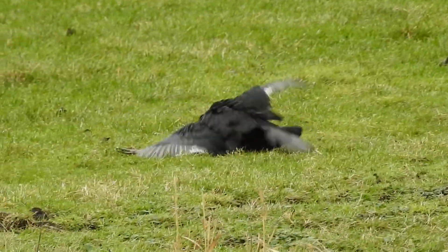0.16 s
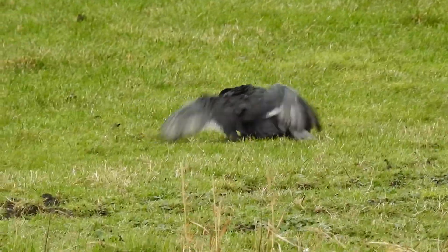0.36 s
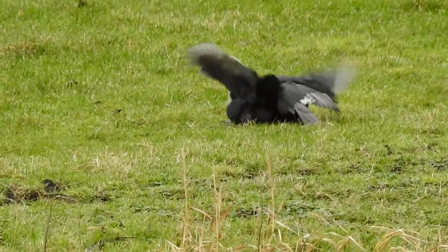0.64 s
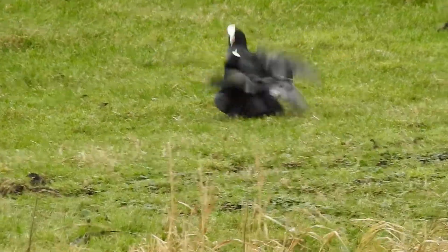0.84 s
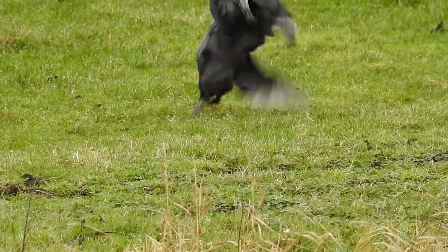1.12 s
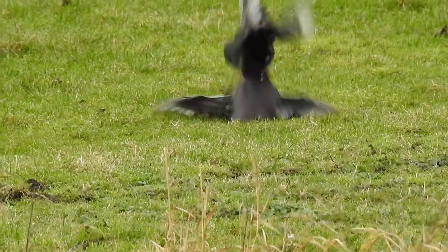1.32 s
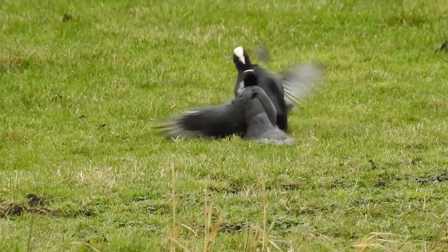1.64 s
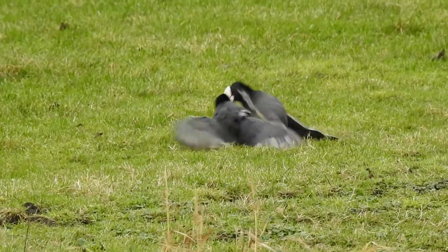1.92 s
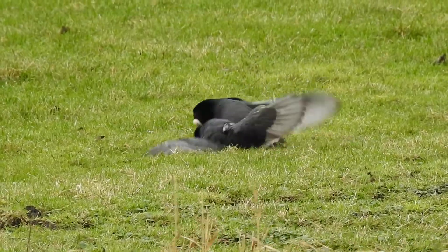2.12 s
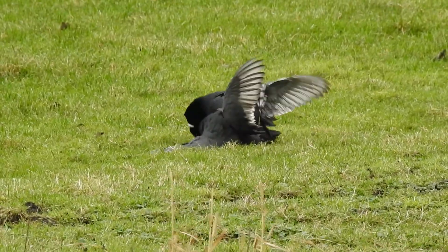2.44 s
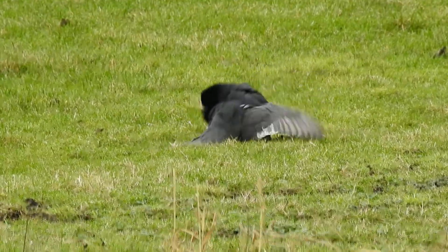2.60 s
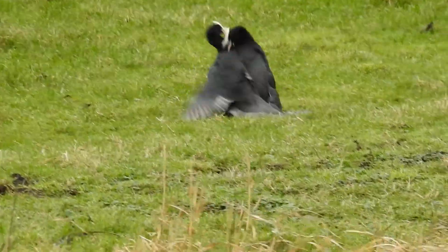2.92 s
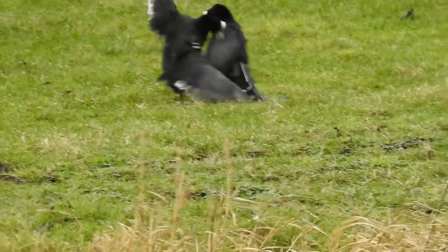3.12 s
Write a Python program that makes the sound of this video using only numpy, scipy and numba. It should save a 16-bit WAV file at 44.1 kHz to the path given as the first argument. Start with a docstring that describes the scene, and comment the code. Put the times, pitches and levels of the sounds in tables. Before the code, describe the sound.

Wind rumbling hard on a microphone over distant roar, while a water bird squeaks briefly twice

```python
"""Gusty wind on a camera in an open field

Wind thuds on both microphone ports, as two mostly unrelated noises, over a far roar and hiss of wide noise.
Close enough to hear through it, a water bird squeaks twice, as stacks of overtones on an arched pitch.
Another bird rasps faintly (rough pulses in a resonance) and one gives a thin peep (a wavering sine).
The strongest wind drives the camera's limiter, which ducks everything in small gain steps."""
import sys
import numpy as np
from scipy import signal
from scipy.fft import rfft, irfft, next_fast_len
from scipy.io import wavfile
from scipy.ndimage import uniform_filter1d, map_coordinates
from numba import njit

SR = 44100
rng = np.random.default_rng(int(sys.argv[2]) if len(sys.argv) > 2 else 0)


def wav_record(signal):
    """Record a signal, one row per channel, as 16-bit PCM in the file named by sys.argv[1]."""
    frames = np.transpose(np.atleast_2d(signal))
    bounded = np.clip(frames, -1, 1)
    # unit amplitude maps onto the largest positive 16-bit level
    quanta = np.round(bounded * 32767).astype(np.int16)
    wavfile.write(sys.argv[1], SR, quanta)


N = 143766
TIME_S = np.arange(N) / SR


def amp(db):
    """Gain of a dB value."""
    return 10 ** (np.asarray(db) / 20)


def unit(x):
    """Scaled to rms 1."""
    return x / np.sqrt(np.mean(x ** 2) + 1e-20)


def over_time(points):
    """(time [s], value) points joined by straight lines over the whole timeline."""
    return np.interp(TIME_S, *np.transpose(points))


def along(points, hz):
    """(frequency [Hz], value) points read on a log frequency axis."""
    f, v = np.transpose(points)
    return np.interp(np.log(hz + 1), np.log(f + 1), v)


def wobble(rate):
    """A smooth random curve with this many knots a second, at most 100."""
    knots = rng.standard_normal(int(N * 100 / SR) + 9)
    return map_coordinates(knots, [TIME_S * rate])


def filtered(x, response):
    """x times a response of frequency, which may be complex."""
    m = next_fast_len(N + SR // 2)
    spectrum = rfft(x, m) * response(np.fft.rfftfreq(m, 1 / SR))
    return irfft(spectrum, m)[..., :N]


def gate(start_s, length_s, attack_s, release_s):
    """Attack, hold and release with sine-shaped edges, silent elsewhere."""
    t = TIME_S - start_s
    edges = np.minimum(t / attack_s, (length_s - t) / release_s)
    return np.sin(np.pi / 2 * np.clip(edges, 0, 1))


def stereo_noise(white, spectrum, alike):
    """Two white noises coloured, then mixed as mid and side to a left-right likeness, rms 1."""
    def mid_side_response(hz):
        turn = np.arccos(along(alike, hz)) / 2
        return amp(along(spectrum, hz)) * [np.cos(turn), np.sin(turn)]

    mid, side = filtered(white, mid_side_response)
    return unit(np.array([mid + side, mid - side]))


def wind():
    """Turbulence on the two ports: low thuds, whose bright edge grows faster than the gust itself."""
    # Wind at the ports before the port gain: (time [s], level [dB])
    gusts = [(0.0, -29), (0.09, -34.5), (0.32, -32.5), (0.36, -22.5), (0.39, -27), (0.43, -23.5),
             (0.48, -26), (0.51, -14.5), (0.58, -16), (0.61, -14), (0.66, -19.5), (0.71, -14.5),
             (0.73, -26.5), (0.81, -31), (0.84, -20.5), (0.96, -29.5), (0.97, -19.5), (1.04, -35),
             (1.06, -18), (1.13, -23), (1.15, -16), (1.31, -15), (1.33, -11.5), (1.42, -20.5),
             (1.43, -11.5), (1.46, -32.5), (1.54, -23), (1.57, -32.5), (1.67, -31.5), (1.68, -46),
             (1.75, -35.5), (1.78, -28.5), (1.88, -35), (2.11, -32), (2.31, -12), (2.46, -19), (2.5, -10),
             (2.61, -18.5), (2.66, -16.5), (2.72, -25), (2.76, -17.5), (2.81, -37), (3.03, -24.5),
             (3.07, -12.5), (3.12, -15), (3.15, -11.5), (3.18, -15.5), (3.26, -14)]
    # Brief puffs and dips in the wind: (centre [s], length [s], level change [dB])
    brief_changes = [(0.577, .02, 0), (1.19, 0.036, 2.5), (1.327, .03, -3.5), (2.335, 0.0067, 4.5),
                     (2.351, 0.011, 10), (2.494, .03, 2), (2.539, 0.0087, 9), (2.664, 0.026, 8),
                     (3.072, 0.025, 7.5), (3.106, 0.03, 6.5), (3.135, 0.0092, 8), (3.16, 0.011, 8),
                     (3.188, .025, 10)]
    # Brightness of the wind, beside its growth with level: (time [s], bright edge gain [dB])
    brightness = [(0, 8), (.4, -13), (.6, -5.5), (.9, 4), (1.1, -15), (1.3, 2), (1.5, -5), (2, -7),
                  (2.3, 1.5), (2.5, 2.5), (2.7, -4), (3.1, 3.5), (3.26, 2.5)]
    # Weight of the deepest rumble: (time [s], gain [dB])
    deep_weight = [(0, 3.5), (.3, 7), (.7, 3), (1.1, 2), (1.4, -1), (1.8, 5.5), (2.1, -0.5), (2.5, -0.5),
                   (2.8, -1), (3.26, -4)]
    # Colour of the low thuds: (frequency [Hz], level per Hz [dB])
    thud_colour = [(15, -55.5), (25, -24.5), (75, -15.5), (145, 1.5), (226, 2.5), (436, -11), (480, -16.5),
                   (653, -15.5), (700, -17), (910, -59), (1540, -120)]
    # Colour of the bright edge of strong wind: (frequency [Hz], level per Hz [dB])
    edge_colour = [(100, -38.5), (200, -8), (300, -1), (400, -4), (550, -10.5), (800, -19.5), (1200, -27.5),
                   (2500, -50.5)] + [(9000, -120)]
    # Colour of the faint treble crackle in gusts: (frequency [Hz], level per Hz [dB])
    crackle_colour = [(1000, -90), (7000, -20), (11000, 0), (16000, -2)]
    # Wind shared by the two ports: (frequency [Hz], likeness [-1 to 1])
    ports_alike = [(30, 0.021), (75, 0.41), (150, 0.0091), (300, 0.28), (600, 0)]
    port_db, deep_hz = 2, 112
    flutter_db, fast_flutter_db = 2.5, 1.5
    edge_db, edge_grows, edge_from_db = -5.5, 0.53, -6  # gain; extra dB per dB of wind, from this level
    thud_gives_way = 0.39  # dB the thud loses per dB of brightness above 0
    crackle_db, crackle_scatter_db = -58, 5

    level_db = over_time(gusts) + port_db
    level_db = level_db + sum(change * np.exp(-(2 * (TIME_S - centre) / length) ** 2)
                              for centre, length, change in brief_changes)
    bright_db = over_time(brightness) + edge_grows * (level_db - edge_from_db)

    def fluttering(colour):
        fast = np.array([wobble(rate=60), wobble(rate=33)])  # left, right
        flutter = unit(amp(flutter_db * wobble(rate=25) + fast_flutter_db * fast))
        return flutter * stereo_noise(rng.standard_normal((2, N)), colour, ports_alike)

    thud = fluttering(thud_colour)
    edge = fluttering(edge_colour)
    deep = filtered(thud, lambda hz: 1 / (1 + (hz / deep_hz) ** 6))
    thud = thud + (amp(over_time(deep_weight)) - 1) * deep

    crackle = stereo_noise(rng.standard_normal((2, N)), crackle_colour, [(1000, .4)])
    crackle = unit(amp(crackle_scatter_db * wobble(rate=99)) * crackle)

    thud_gain = amp(-thud_gives_way * np.maximum(bright_db, 0))
    edge_gain = amp(edge_db + bright_db)
    return amp(level_db) * (amp(crackle_db) * crackle + thud_gain * thud + edge_gain * edge)


def field():
    """Far wide roar and hiss with faint patches, reaching the left port slightly later."""
    # Colour of the far roar and hiss: (frequency [Hz], level per Hz [dB])
    roar_colour = [(20, -48.5), (60, -29.5), (135, -1), (237, -7.5), (392, -5), (576, -7), (954, -4),
                   (1250, -4.5), (1580, -8.5), (1850, -11.5), (2050, -15.5), (2700, -18.5), (3500, -18),
                   (3900, -23), (4500, -20), (6360, -18.5), (7480, -30), (9720, -42), (12000, -51.5),
                   (16000, -65)]
    # Likeness of the two sides: (frequency [Hz], likeness [-1 to 1])
    sides_alike = [(60, 0.71), (120, .5), (230, 0.73), (460, 1), (910, 0.97), (1800, 0.9), (3560, 1),
                   (5500, 0.42), (7030, 0.5), (9000, 0.82), (12000, 0.17), (15000, .6)]
    # Lean of the roar to the left: (frequency [Hz], left over right [dB])
    leans = [(100, 1), (650, 0), (2140, 0), (7030, 1.4), (12000, -0.5)]
    # Slow drift about the base level: (time [s], level [dB])
    drift = [(0, 2), (.5, 0), (1.5, -0.1), (2.2, 0.83), (3.26, 0)]
    base_db, patch_db, left_lag_s = -25.5, 1.24, 4.2e-5

    z = signal.stft(rng.standard_normal((2, N)), nperseg=512)[2]
    # random patches in frequency and time, the same on both sides
    patches = uniform_filter1d(rng.standard_normal(z.shape[1:]), size=6, axis=0)
    patches = uniform_filter1d(patches, size=12, axis=1)
    pair = signal.istft(z * amp(patch_db * unit(patches)), nperseg=512)[1][:, :N]

    sides = np.array([[.5], [-.5]])  # half the lean and lag on each side

    def placement(hz):
        return amp(sides * along(leans, hz)) * np.exp(-2j * np.pi * hz * sides * left_lag_s)

    placed = filtered(stereo_noise(pair, roar_colour, sides_alike), placement)
    return amp(base_db + over_time(drift)) * unit(placed)


def squeaks():
    """Harmonic stacks on an arched pitch without the fundamental; each overtone shimmers and shifts in level."""
    # Squeaks: (start [s], length [s], top pitch [Hz], gain [dB], end pitch under the top [0-1])
    calls = [(.852, 0.031, 1092, -30.5, .045), (1.655, 0.04, 1101, -30.5, .075)]
    # Overtones: (multiple, first squeak [dB], second squeak [dB], change by the end of the second [dB])
    overtones = [(2, -12, -25, -3), (3, 0.5, -1, 3), (4, -1.5, -2, -5), (5, -2.5, 2.5, -8),
                 (6, -2.5, -2, -6), (7, -10, -17, 1), (8, -24, -17, 7.5), (9, -38, -32, -6),
                 (10, -38, -32, -10)]
    rise, top_at = .045, .3  # start pitch under the top [0-1]; place of the top [0-1]
    attack_s, release_s, shimmer_db = 0.0039, 0.011, 3

    out = np.zeros(N)
    for i, (start, length, top_hz, db, fall) in enumerate(calls):
        u = np.clip((TIME_S - start) / length, 0, 1)
        before = np.maximum(1 - u / top_at, 0)
        after = np.maximum(u - top_at, 0) / (1 - top_at)
        turns = np.cumsum(top_hz * (1 - rise * before ** 2 - fall * after ** 1.35)) / SR
        progress = after * length / calls[-1][1]  # a shorter squeak changes less
        stack = np.zeros(N)
        for row in overtones:
            tone_db = row[1 + i] + row[3] * progress + shimmer_db * wobble(rate=99)
            stack += amp(tone_db) * np.sin(2 * np.pi * round(row[0]) * turns)
        out += amp(db) * gate(start, length, attack_s, release_s) * stack
    return out


def far_birds():
    """Pulses and breathy noise through one resonance for the rasps, a wavering sine for the peep."""
    # Rasping notes: (start [s], length [s], centre [Hz], level [dB])
    notes = [(2.072, .093, 3170, -38.5), (2.162, .055, 3200, -35.5), (2.21, .118, 3330, -37),
             (2.412, .07, 3300, -37)]
    pulse_hz, width_hz, roughness, edge_s = 272, 340, .45, .014  # roughness: noise share [0-1]
    peep_start_s, peep_length_s, peep_hz, peep_db = 1.575, .055, 2450, -39

    turns = np.cumsum(pulse_hz * (1 + .015 * wobble(rate=20))) / SR
    pulses = unit(np.diff(np.floor(turns), prepend=0))  # one click a turn
    voice = (1 - roughness) * pulses + roughness * rng.standard_normal(N)

    peep_turns = np.cumsum(peep_hz * (1 + .006 * wobble(rate=40))) / SR
    peep_gate = gate(peep_start_s, peep_length_s, edge_s, edge_s)
    out = amp(peep_db) * peep_gate * np.sin(2 * np.pi * peep_turns)
    for start, length, centre_hz, db in notes:
        note = unit(filtered(voice, lambda hz: np.exp(-((hz - centre_hz) / width_hz) ** 2)))
        out += amp(db) * gate(start, length, edge_s, edge_s) * note
    return out


def scene():
    """Wind on the ports, the far field, and the birds a little to the left."""
    bird_left_db = 1.3  # up on the left, down on the right
    birds = (squeaks() + far_birds()) * amp([[bird_left_db], [-bird_left_db]])
    return wind() + field() + birds


@njit
def follow(peak, attack, release):
    """Envelope that rises fast and falls slowly."""
    out, level = np.empty_like(peak), 0.0
    for i in range(len(peak)):
        level += (peak[i] - level) * (attack if peak[i] > level else release)
        out[i] = level
    return out


def record(dry):
    """One fast limiter for both channels whose gain moves in steps, the camera's hiss, then the band limit."""
    # Colour of the camera's own hiss: (frequency [Hz], level per Hz [dB])
    hiss_colour = [(1000, -93)] + [(6000, -30), (10000, -3), (12000, 0), (16000, -3)]
    limit_db, step_db, attack_s, release_s = -6.5, .2, .0007, .01
    hiss_db, top_hz = -72, 15760

    level = follow(np.abs(dry).max(axis=0), 1 / (1 + attack_s * SR), 1 / (1 + release_s * SR))
    cut_db = np.maximum(20 * np.log10(level + 1e-9) - limit_db, 0)
    limited = dry * amp(-step_db * np.round(cut_db / step_db))
    hiss = amp(hiss_db) * stereo_noise(rng.standard_normal((2, N)), hiss_colour, [(1000, .4)])
    return filtered(limited + hiss, lambda hz: hz < top_hz)


dry = scene()
out = record(dry)
wav_record(out)
```